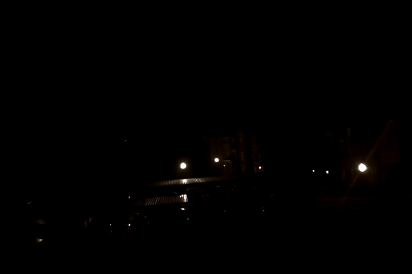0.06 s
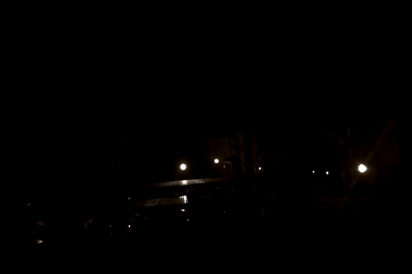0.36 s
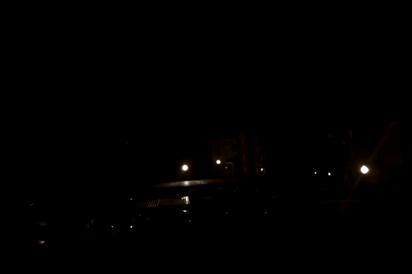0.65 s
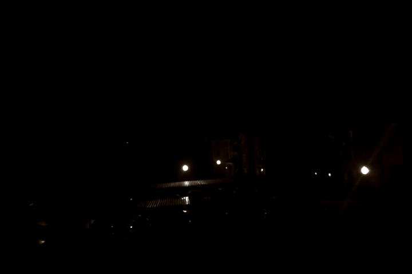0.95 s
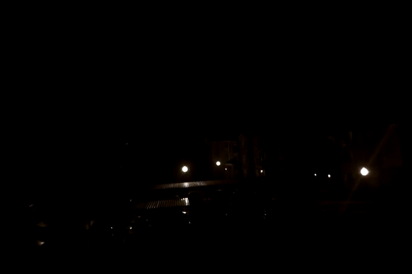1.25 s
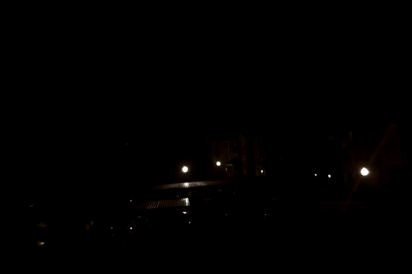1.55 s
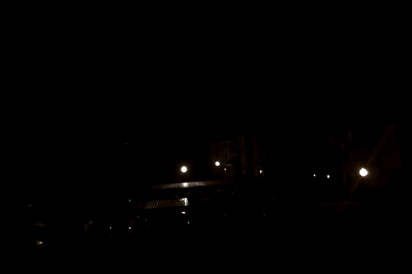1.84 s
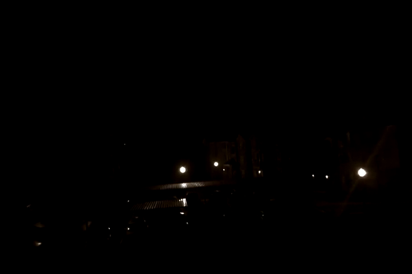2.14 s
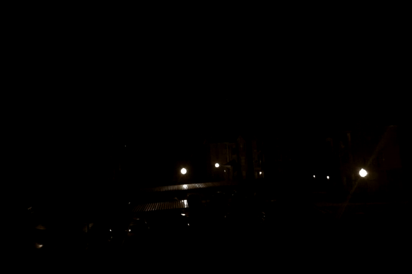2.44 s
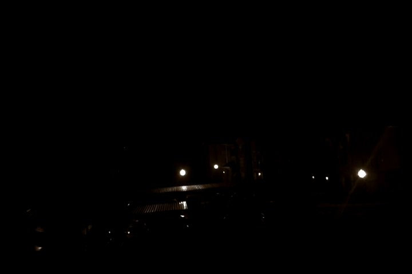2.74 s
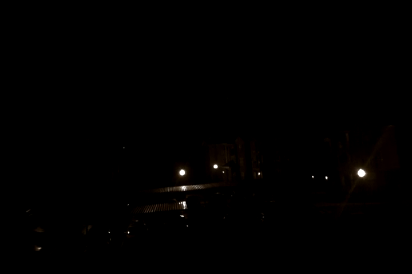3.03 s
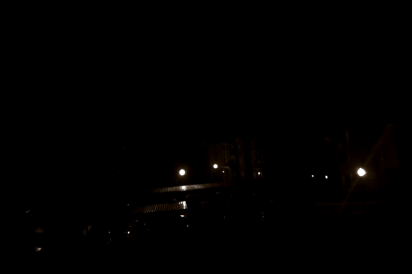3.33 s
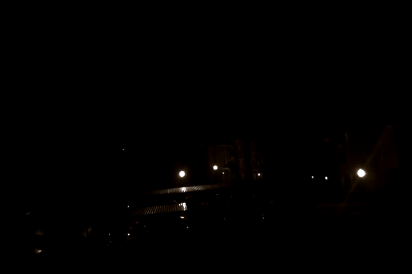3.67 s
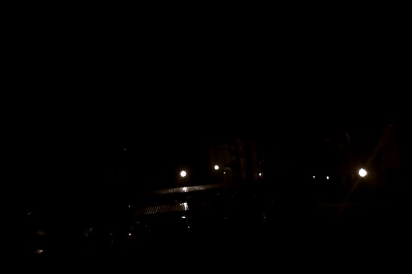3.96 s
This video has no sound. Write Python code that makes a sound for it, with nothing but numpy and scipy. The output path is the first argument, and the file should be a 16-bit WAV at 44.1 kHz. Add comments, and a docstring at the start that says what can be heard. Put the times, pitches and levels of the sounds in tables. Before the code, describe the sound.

Many frogs call in overlapping pulsed trills, near and far, outdoors in the dark.

```python
"""Tree frogs trill at a night pond, a few near and a crowd farther off.
Each trill is a run of short, rising tones, about thirty a second. A cricket frog clicks in quickening
groups, and toads drone on sinking notes, mostly at first. The bank and the trees echo the calls
over a faint rumble of far traffic."""
import sys
import numpy as np
from scipy import signal
from scipy.fft import rfft, irfft
from scipy.io import wavfile

SR = 44100
rng = np.random.default_rng(int(sys.argv[2]) if len(sys.argv) > 2 else 0)


def to_wav(sig):
    """Store sig (one row per channel, or 1-D mono) as 16-bit WAV at the path in sys.argv[1].

    Samples outside -1..1 are clipped; the rate is SR.
    """
    pcm = np.clip(np.atleast_2d(sig), -1, 1) * 32767
    pcm = np.round(pcm).astype(np.int16)
    wavfile.write(sys.argv[1], SR, pcm.T)  # frames by channels


N = 176400
TIME = np.arange(N) / SR


def from_db(db):
    """Turns decibels into a number to multiply a sound by."""
    return 10 ** (np.asarray(db) / 20)


def rms_one(x):
    """Scales a sound so that its average strength (rms) is 1."""
    return x / np.sqrt(np.mean(x ** 2) + 1e-20)


def add(out, start_s, sound):
    """Mixes a short sound in at its time."""
    i = int(round(start_s * SR))
    low, high = max(i, 0), min(i + len(sound), N)
    if high > low:
        out[low:high] += sound[low - i:high - i]


def coloured(gain_at):
    """Noise of strength 1, shaped by the given gain at each frequency."""
    hz = np.maximum(np.arange(N // 2 + 1) * SR / N, 1)
    return rms_one(irfft(rfft(rng.standard_normal(N)) * gain_at(hz), N))


def wash(spectrum):
    """Steady noise whose balance of low and high follows a table."""
    points_hz, db = np.transpose(spectrum)
    return coloured(lambda hz: from_db(np.interp(np.log(hz), np.log(points_hz), db)))


def drift(rate_hz):
    """A random wobble of strength 1, mostly slower than rate_hz."""
    return coloured(lambda hz: 1 / (1 + (hz / rate_hz) ** 2))


def outdoors(x, echo_db, tail_s=0.35):
    """The direct sound, quick echoes from the bank and reeds, and a longer scatter from the trees."""
    bank_s, bank_share, delay_s = 0.04, 0.23, 0.003
    t = TIME[:SR]
    # Each echo dies away by 60 dB in its fade time.
    bank, trees = (rms_one(np.exp(-np.log(1000) * t / fade_s)) for fade_s in (bank_s, tail_s))
    fade = np.sqrt(bank_share * bank ** 2 + (1 - bank_share) * trees ** 2)
    echoes = rng.standard_normal(SR) * fade * (t > delay_s)
    return x + from_db(echo_db) * signal.fftconvolve(x, rms_one(echoes) / np.sqrt(SR))[:N]


def trill(start, length, rate, hz):
    """One tone of a frog's trill: almost evenly spaced pulses, each sliding up through the pitch hz."""
    rise_s, fall_s, squareness = 0.0027, 0.0025, 2.52   # squareness 2 is a bell; more is flatter on top
    glide_per_s = 13.7   # as a share of the pitch
    jitter_s, spread_db = 0.0005, 1.9
    t = np.arange(-SR // 80, SR // 80) / SR
    envelope = np.exp(-.5 * np.abs(t / np.where(t < 0, rise_s, fall_s)) ** squareness)
    pulse = envelope * np.sin(2 * np.pi * hz * (t + .5 * glide_per_s * t ** 2))
    out, chance = np.zeros(N), rng.standard_normal(size=(60, 2))
    for s, (late, loud) in zip(np.arange(start, start + length, 1 / rate), chance):
        add(out, s + t[0] + jitter_s * late, pulse * from_db(spread_db * loud))
    return out


def night_air():
    """A steady wash with the low hum of far traffic and the blur of the farthest frogs."""
    # Night air and far traffic: (frequency [Hz], relative level [dB])
    air = [(25, -54), (40, -37.5), (62, -13), (100, -9.5), (135, 0.5), (170, -1.5), (240, 3.5), (330, -4.5),
           (450, -7.5), (620, -6.5), (850, -10.5), (1700, -5.5), (2900, -8.5), (3550, -2.5), (4400, -17.5),
           (5500, -22), (6600, -23), (7500, -40)]
    # The farthest frogs, merged into a blur: (frequency [Hz], relative level [dB])
    blur = [(850, -46), (1050, -9), (1170, -2.5), (1370, -5.5), (1600, -22), (1900, -22.5), (2250, 4),
            (2500, -4.5), (2700, -4), (2950, -26), (3300, -47.5)]
    hum_hz, hum_width_hz = 130.2, 15
    hum = coloured(lambda hz: 1 / (1 + ((hz - hum_hz) / hum_width_hz) ** 2))
    return from_db(-59) * wash(air) + from_db(-67.5) * hum + from_db(-50) * wash(blur)


def toads():
    """Long buzzing notes that sink as the breath runs out, with a thin shrill band above at first."""
    # Toad notes: (start [s], end [s], first pitch [Hz], last pitch [Hz], buzz rate [Hz], level [dB])
    drones = [(-.1, 1.23, 2105, 1945, 112, -53), (-.1, .66, 1845, 1745, 88, -63),
              (-.1, .7, 1995, 1850, 71, -62), (2.55, 4.1, 1690, 1660, 85, -73)]
    fade_s, buzz_depth, waver = 0.021, 0.99, 0.0043
    shrill_hz, sag_hz_per_s, shrill_end_s = 6120, 67, 1.23
    out = np.zeros(N)
    for start, end, first_hz, last_hz, buzz_hz, db in drones:
        hz = np.interp(TIME, [start, end], [first_hz, last_hz]) * (1 + waver * drift(rate_hz=15))
        # The buzz slows as the pitch sinks.
        buzz = 1 + buzz_depth * np.sin(2 * np.pi * buzz_hz * np.cumsum(hz / first_hz) / SR)
        fade = np.clip(np.minimum(TIME - start, end - TIME) / fade_s, 0, 1)
        out += from_db(db) * fade * buzz * np.sin(2 * np.pi * np.cumsum(hz) / SR)
    shrill = drift(rate_hz=210) * np.sin(2 * np.pi * np.cumsum(shrill_hz - sag_hz_per_s * TIME) / SR)
    shrill_fade = np.clip((shrill_end_s - TIME) / fade_s, 0, 1)
    return outdoors(out, echo_db=-3.5) + from_db(-74) * shrill * shrill_fade


def far_tree_frogs(count=64, trill_s=0.7):
    """A crowd of overlapping trills, each frog with its own pitch and pulse rate."""
    # How loud the crowd is: (time [s], upper tones' level [dB], lowest tone's level [dB])
    crowd_levels = [(0, -43, -52.5), (.25, -49.5, -64.5), (0.448, -50.5, -54.5), (0.751, -46.5, -50.5),
                    (.85, -43, -49), (1.7, -41.5, -51), (2.1, -44.5, -51.5), (2.5, -46, -49),
                    (2.9, -44.5, -51.5), (3.2, -42, -52), (3.601, -47, -51.5), (4, -42.5, -51.5)]
    # Large, low-voiced frogs: (start [s], length [s], pulse rate [Hz], pitch [Hz], level [dB])
    low_trills = [(-.1, 1.1, 33, 2110, -44.5), (0.797, 0.75, 36, 2060, -45), (1.4, 0.82, 33.7, 2124, -50.5),
                  (2.938, 1.2, 44, 1994, -52.5)]
    upper, lower = np.zeros(N), np.zeros(N)
    starts = np.linspace(-trill_s, N / SR, count)
    for start, (shift, haste) in zip(starts, rng.triangular(-1, 0, 1, size=(count, 2))):
        rate = 31 + 5 * haste   # pulses a second
        upper_hz, lower_hz = 2368.7 + 277 * shift, 1214 + 198 * shift
        upper += trill(start, trill_s, rate, upper_hz)
        upper += from_db(-32) * trill(start, trill_s, rate, 1.5 * upper_hz)
        lower += trill(start, trill_s, rate, lower_hz)
    times, upper_db, lower_db = np.transpose(crowd_levels)
    crowd = np.zeros(N)
    for tones, db in ((upper, upper_db), (lower, lower_db)):
        crowd += from_db(np.interp(TIME, times, db)) * rms_one(outdoors(tones, echo_db=0))
    large = sum(from_db(db) * trill(start, length, rate, hz) for start, length, rate, hz, db in low_trills)
    return crowd + outdoors(large, echo_db=0)


def cricket_frog():
    """Each click is a tiny, raspy, rising tone shaped by the throat sac, with a soft higher tone."""
    # Clicks: (time [s], level before the sac [dB], pitch [Hz])
    clicks = [(0.0588, -40, 3730), (0.1157, -37, 3710), (0.1304, -39.5, 3770), (0.3119, -40.5, 3670),
              (0.3679, -39, 3730), (.4505, -36.5, 3840), (0.4597, -38.5, 3840), (.469, -38.5, 3850),
              (0.654, -40.5, 3660), (0.7158, -40.5, 3800), (0.8009, -37.5, 3870), (0.81, -39.5, 3870),
              (.818, -39, 3860), (.9935, -42.5, 3720), (1.06, -37.5, 3740), (1.1279, -38, 3720),
              (1.1563, -38.5, 3850), (1.169, -40, 3920), (1.3651, -41, 3690), (1.4318, -36.5, 3780),
              (1.498, -36.5, 3820), (1.5085, -39, 3820), (1.518, -50.5, 3890), (1.6999, -39, 3680),
              (1.7522, -39, 3770), (1.8274, -35, 3830), (1.8528, -36.5, 3870), (1.8688, -40, 3880),
              (2.0782, -41, 3700), (2.1345, -39, 3730), (2.2058, -36.5, 3830), (2.2474, -35.5, 3910),
              (2.2596, -41.5, 3720), (2.4647, -41, 3710), (2.5265, -39.5, 3770), (2.599, -40.5, 3860),
              (2.643, -39, 3800), (2.6589, -38.5, 3910), (2.8685, -42.5, 3740), (2.9355, -40, 3710),
              (3.0125, -38, 3740), (3.0332, -39, 3900), (3.046, -42, 3800), (3.2474, -42, 3740),
              (3.3218, -39.5, 3720), (3.3895, -40.5, 3790), (3.4546, -38, 3840), (3.4658, -36.5, 3910),
              (3.6962, -40.5, 3700), (3.7584, -40, 3720), (3.812, -40, 3820), (3.8601, -39.5, 3780),
              (3.8735, -40.5, 3950)]
    attack_s, hold_s, ring_s = 0.00062, 0.0031, 0.00041
    glide_hz_per_s, overtone_hz, sac_band_hz = 75000, 5480, (2200, 4080)
    main, overtone, t = np.zeros(N), np.zeros(N), TIME[:SR // 100]
    envelope = np.minimum(t / attack_s, 1) * np.exp(-np.maximum(t - hold_s, 0) / ring_s)
    for s, db, hz in clicks:
        burst = from_db(db) * envelope
        cycles = t * (hz + .5 * glide_hz_per_s * (t - hold_s))
        add(main, s - attack_s, burst * np.sin(2 * np.pi * cycles))
        add(overtone, s, burst * np.sin(2 * np.pi * overtone_hz * t))
    sac = signal.butter(3, sac_band_hz, "band", fs=SR, output="sos")
    rasp = 1 + 0.54 * drift(rate_hz=600)
    voice = signal.sosfilt(sac, main * rasp) + from_db(-20.5) * overtone
    return outdoors(voice, echo_db=-3, tail_s=0.25)


def near_tree_frogs():
    """Each trill stacks three tones: a lowest one, a strong one an octave up and a faint third."""
    # Near trills: (start [s], length [s], pulse rate [Hz], octave's pitch [Hz], octave's level [dB],
    # lowest tone's level [dB])
    trills = [(0.263, .66, 29.75, 2310, -42, -55), (0.510, .39, 34.9, 2330, -44, -48),
              (0.839, .39, 30.0, 2400, -38.5, -52), (0.991, .44, 31.15, 2340, -39, -53),
              (1.377, .62, 30.9, 2350, -39, -60), (1.463, .33, 31.85, 2380, -43, -45),
              (2.022, .16, 29.4, 2320, -36.5, -54), (2.272, .37, 28.7, 2380, -35, -51),
              (2.625, .68, 30.4, 2320, -35, -52), (2.660, .33, 31.7, 2280, -45, -45),
              (2.922, .37, 33.95, 2320, -43, -54), (3.283, .65, 30.4, 2310, -44, -60),
              (3.446, .55, 30.15, 2320, -32.5, -58)]
    out = np.zeros(N)
    for start, length, rate, octave_hz, octave_db, lowest_db in trills:
        for multiple, db in enumerate((lowest_db, octave_db, octave_db - 25.5), 1):
            out += from_db(db) * trill(start, length, rate, multiple * octave_hz / 2)
    return outdoors(out, echo_db=-8)


def scene():
    """The whole pond, in one channel."""
    return (near_tree_frogs() + far_tree_frogs() + cricket_frog() + toads() + night_air())[None]


def record(dry):
    """Cuts the highest treble off steeply."""
    cutoff_hz = 7400
    return signal.sosfilt(signal.ellip(10, .2, 80, cutoff_hz, fs=SR, output="sos"), dry)


dry = scene()
out = record(dry)
to_wav(out)
```